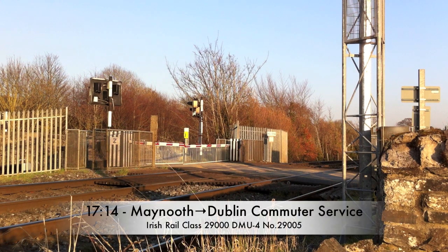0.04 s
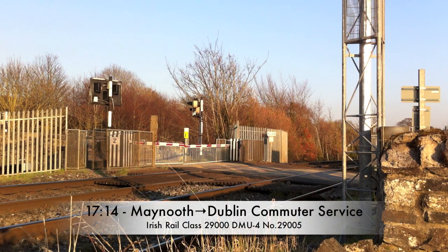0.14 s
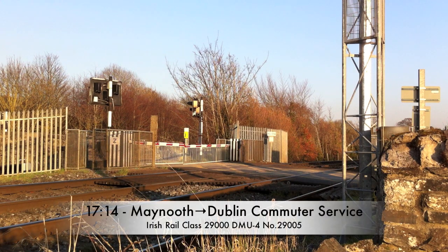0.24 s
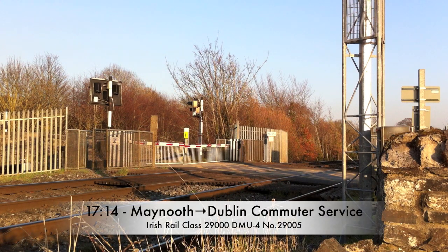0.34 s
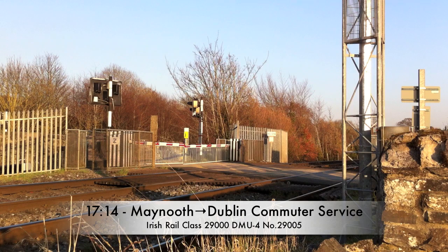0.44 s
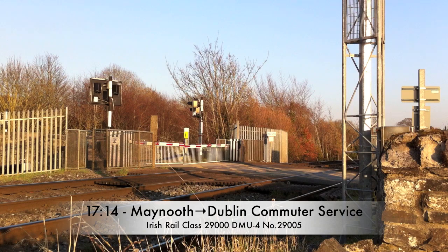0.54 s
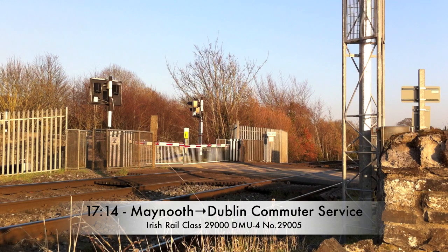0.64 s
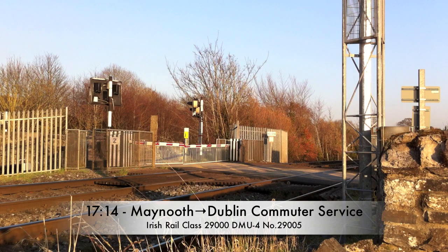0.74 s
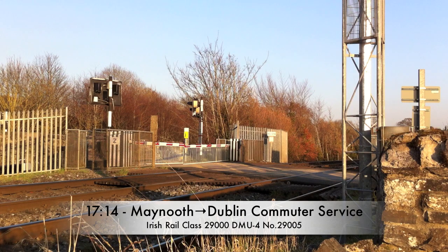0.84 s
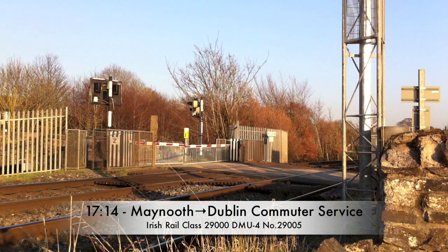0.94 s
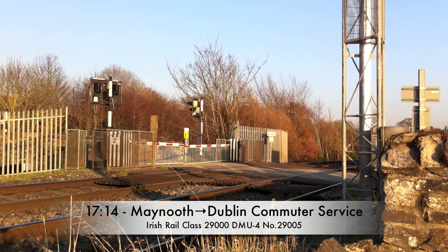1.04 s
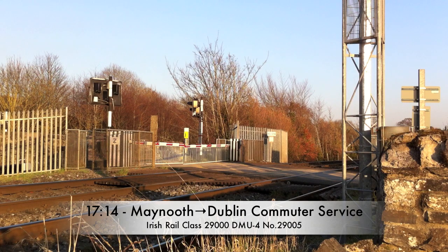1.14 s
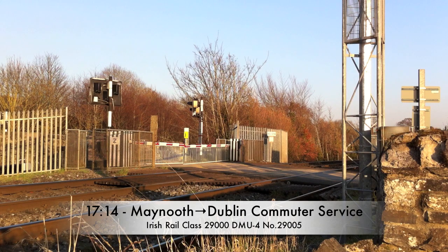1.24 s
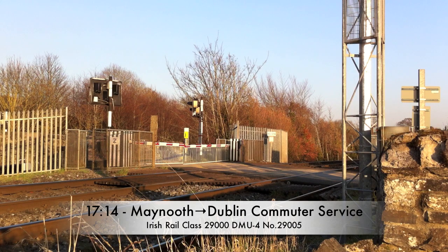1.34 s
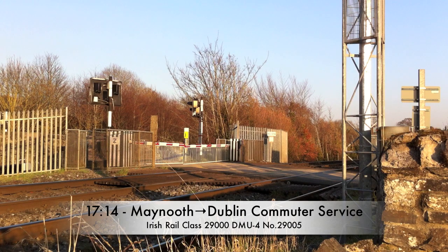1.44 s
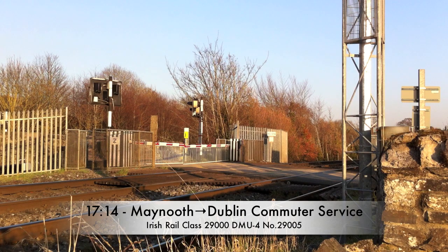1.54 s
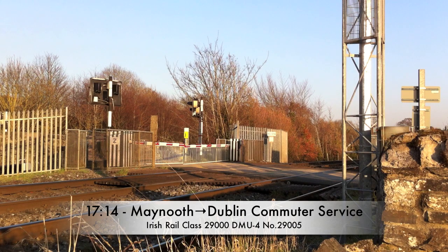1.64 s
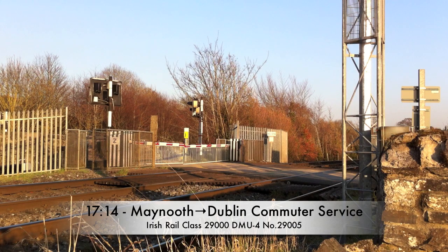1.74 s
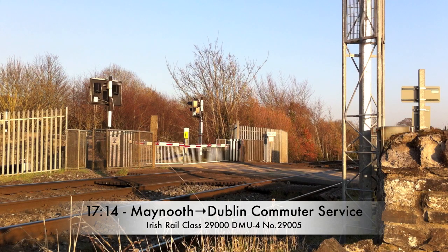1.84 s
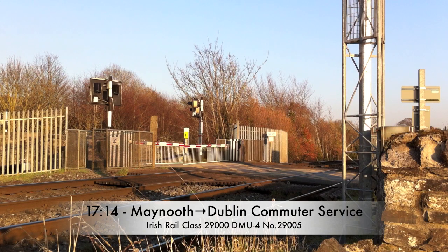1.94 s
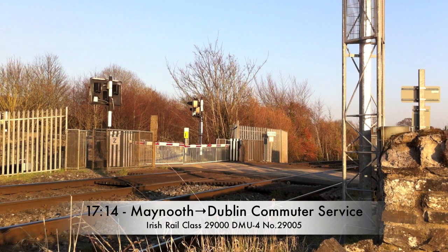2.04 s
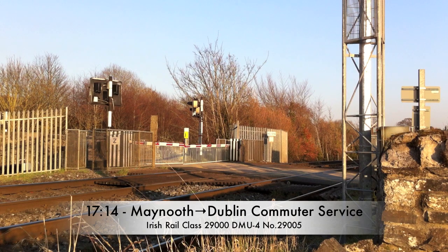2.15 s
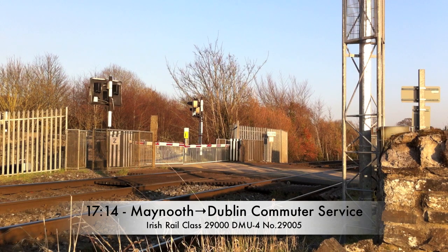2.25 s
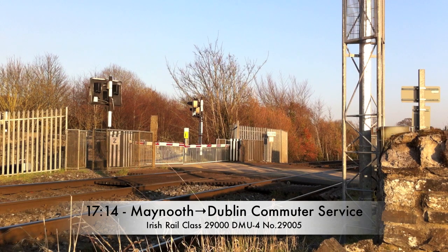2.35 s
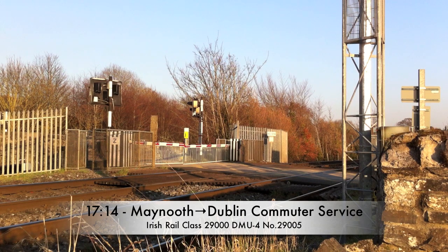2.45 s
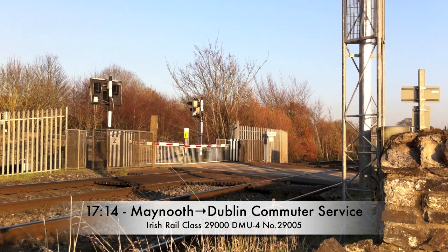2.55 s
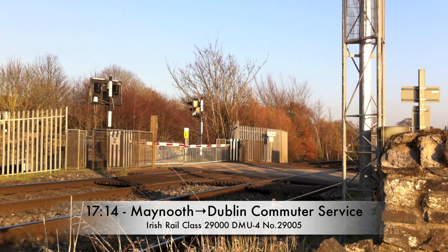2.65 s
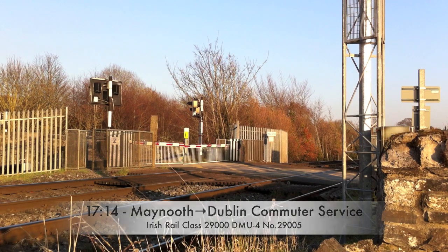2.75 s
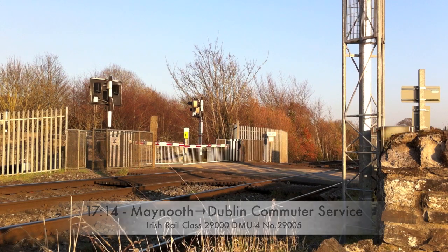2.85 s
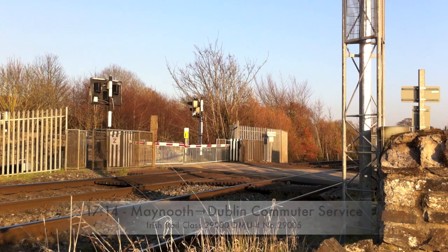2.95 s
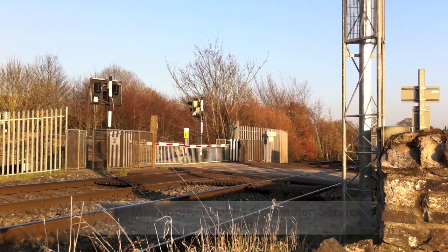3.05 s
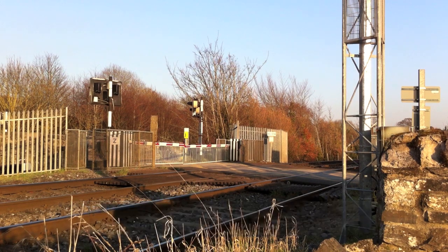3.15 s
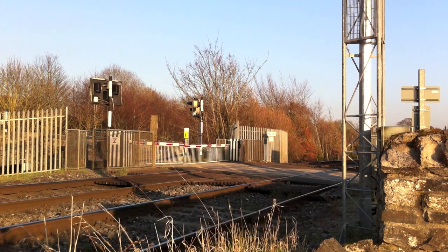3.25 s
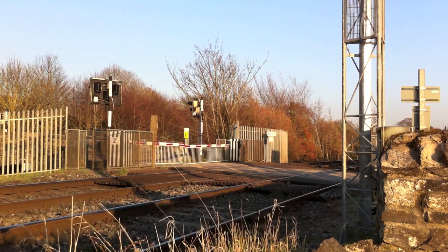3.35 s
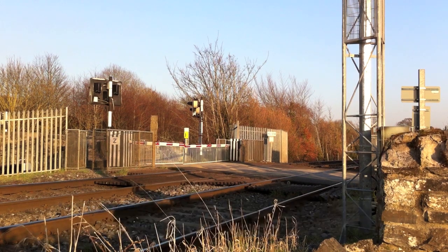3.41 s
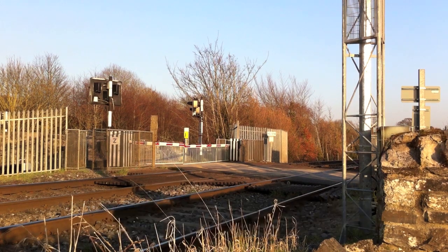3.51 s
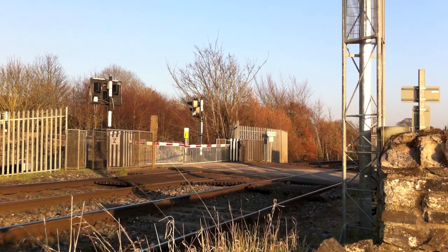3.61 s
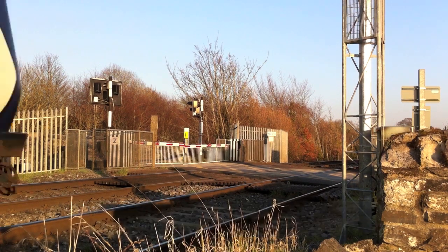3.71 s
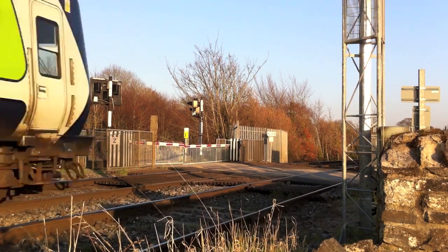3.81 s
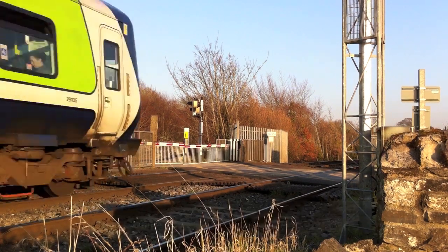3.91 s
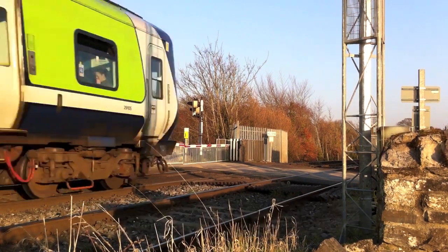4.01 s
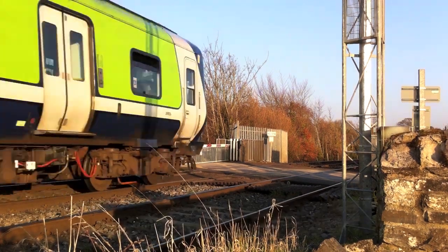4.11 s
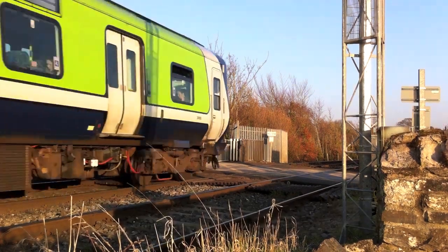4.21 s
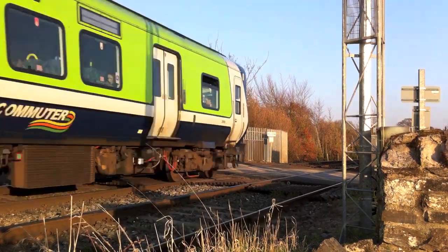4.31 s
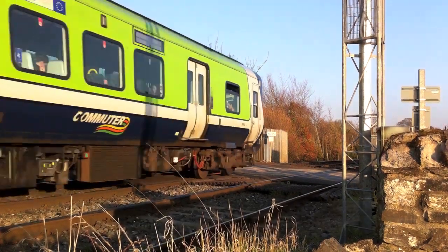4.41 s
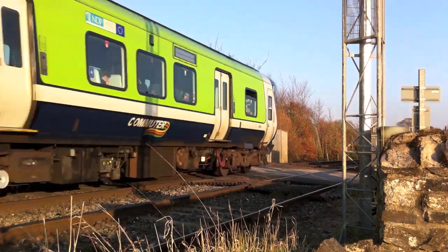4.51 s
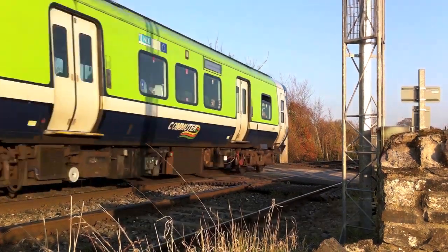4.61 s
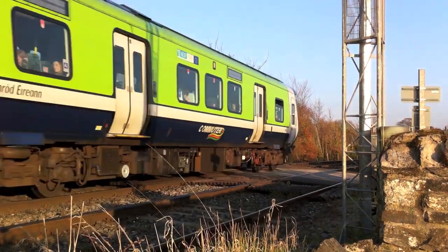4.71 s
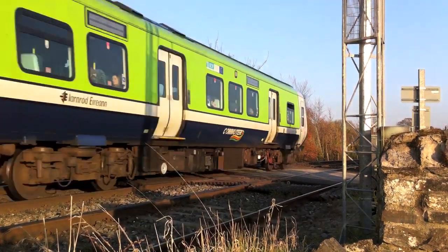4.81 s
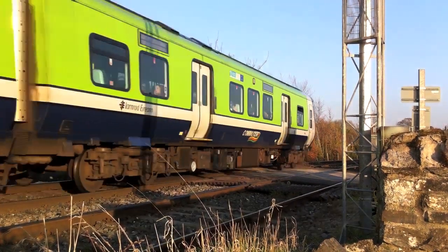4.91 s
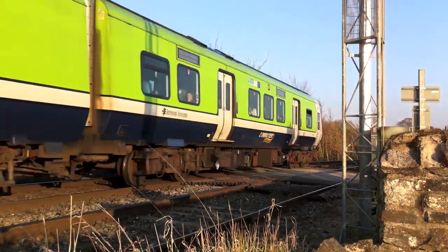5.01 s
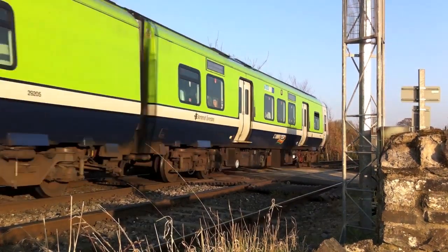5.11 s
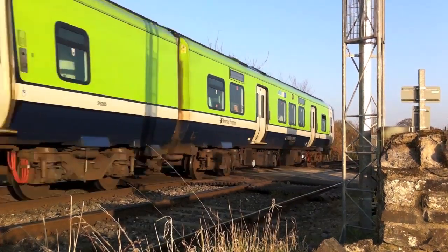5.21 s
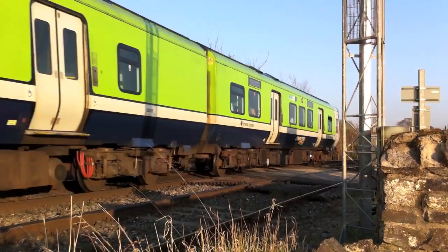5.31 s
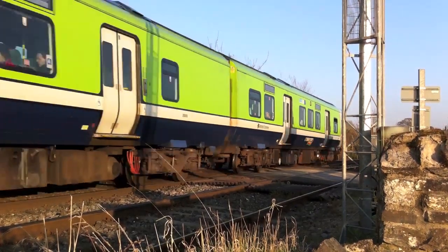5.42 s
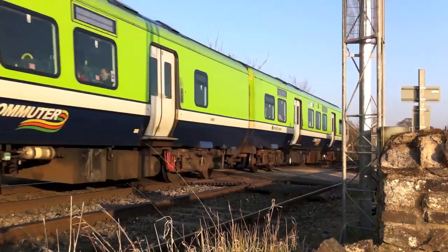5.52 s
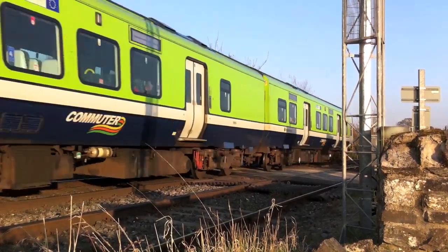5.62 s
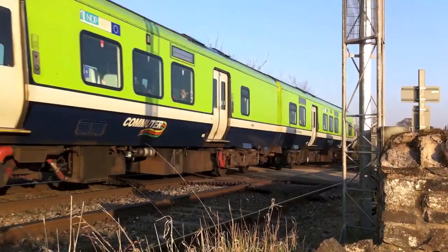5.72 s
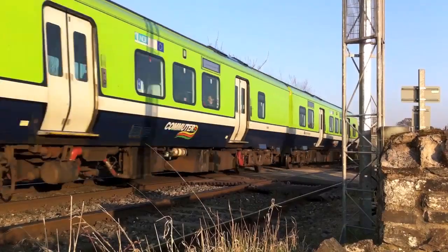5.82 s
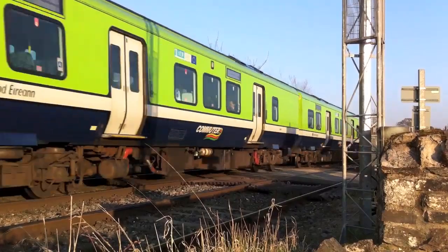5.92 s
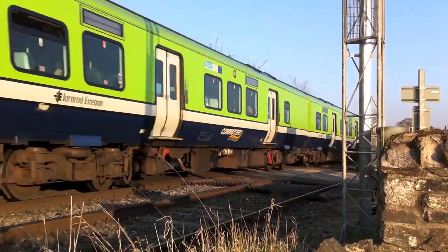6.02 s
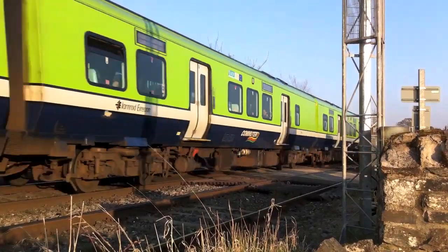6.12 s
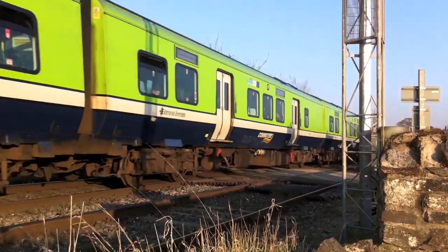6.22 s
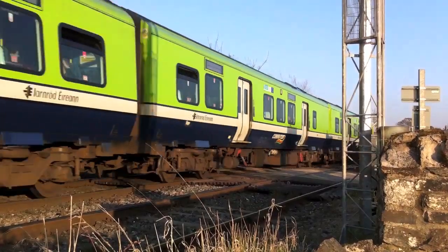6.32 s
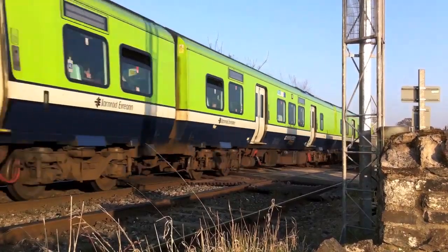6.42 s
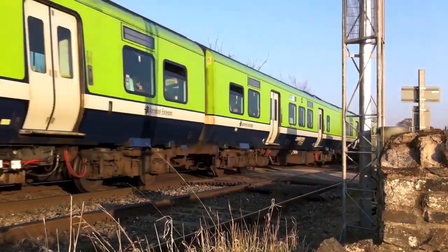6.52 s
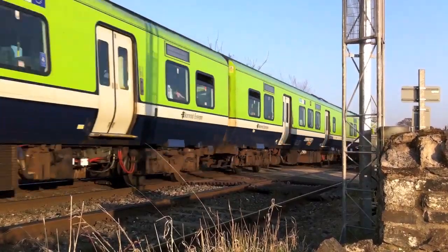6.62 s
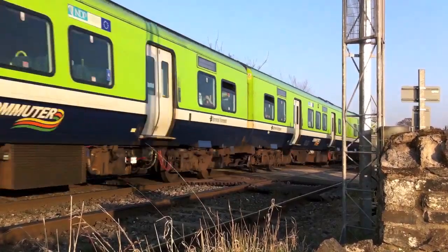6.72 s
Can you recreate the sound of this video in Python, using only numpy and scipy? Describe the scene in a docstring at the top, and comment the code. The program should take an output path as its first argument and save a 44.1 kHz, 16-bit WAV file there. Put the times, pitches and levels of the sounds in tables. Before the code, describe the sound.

A distant, narrow metallic rushing along the rails grows slowly for two seconds, then surges quickly as a diesel train reaches the single microphone near the track. The sound broadens into a dense, gritty roar with low thuds, ringing wheels and airy hiss. Each bogie makes a swell, and short gear and wheel tones glide downward. There is little deep bass, open air around it, and no fade-out.

```python
"""Diesel railcar train rolling past

A diesel railcar train approaches on welded rails and rolls past one microphone beside the track.
Shaped noise makes ballast, rails, sleepers, floor pans, ringing wheels, hissing fans and stirred air.
Sines make the engine drone and the brief notes of gears, wheels and floor pans; decaying sines make
short knocks and blips. A faint hiss from the rails and a low rumble of the surroundings lie beneath.
"""
import sys
import numpy as np
from scipy import signal
from scipy.fft import rfft, irfft, next_fast_len
from scipy.io import wavfile
from scipy.ndimage import uniform_filter1d, map_coordinates

SR = 44100
rng = np.random.default_rng(int(sys.argv[2]) if len(sys.argv) > 2 else 0)


def inscribe(sig):
    """Save sig as 16-bit PCM at rate SR to the path in sys.argv[1].

    A 1-D sig is mono; a 2-D sig holds one channel per row.
    Samples are clipped to [-1, 1] before scaling.
    """
    pcm = np.round(np.clip(np.atleast_2d(sig).T, -1, 1) * 32767)
    wavfile.write(sys.argv[1], SR, pcm.astype(np.int16))


def decibels_to_gain(level_db):
    """Convert a level in decibels to a linear amplitude gain (20 dB per decade)."""
    exponent = np.asarray(level_db, float) / 20
    return 10 ** exponent


N = 298116

# The train draws near, 0 dB = alongside. Each row: time in seconds, track-bed rumble in dB,
# rail roar in dB, wheel ring in dB, fan and air hiss in dB.
APPROACH_ROWS = [(0.0, -30.5, -30.5, -39, -33.5), (0.6, -31, -28.5, -31, -31), (1.2, -28, -26.5, -29, -28),
                 (1.8, -25.5, -22.5, -25, -24), (2.2, -20.5, -21.5, -21, -20.5),
                 (2.6, -18, -18, -15.5, -16.5), (2.85, -13, -15.5, -12.5, -14.5),
                 (3.05, -8.5, -20, -9, -11), (3.3, -5.5, -15, -7.5, -8.5), (3.45, -4, -4.5, -4.5, -5.5),
                 (3.6, -0.5, 0, -0.5, -0.5)]
# Bogies roll by. Each row: time in seconds, rail swell in dB, wheel swell in dB, ballast swell in dB.
BOGIE_ROWS = [(3.8, 5, 6, -2), (4.22, 5.5, 4.5, 1), (4.85, 2, 2.5, 0.5), (5.2, 3, 4.5, -0.3),
              (5.45, 5, 0.5, 1), (5.7, 0.5, 3.5, 1), (6.1, 5.5, 8, 2.5), (6.5, 6, 6, 1),
              (6.76, 3.5, 4, 1.5)]
BOGIE_S = 0.17  # s, half-width of a bogie's swell


def unit(x):
    """Scaled to rms 1."""
    return x / np.sqrt(np.mean(x ** 2) + 1e-20)


def curves(rows):
    """One value per sample for each column after the time."""
    s, *columns = np.transpose(rows)
    return [np.interp(np.arange(N) / SR, s, column) for column in columns]


def wobble(rate):
    """A smooth random curve, rate knots a second."""
    knots = rng.standard_normal(int(N * rate / SR) + 4)
    return map_coordinates(knots, [np.arange(N) * rate / SR])


def filtered(x, response):
    """x passed through a complex response of frequency."""
    size = next_fast_len(N + 8192)
    spectrum = rfft(x, size) * response(np.fft.rfftfreq(size, 1 / SR))
    return irfft(spectrum, size)[:N]


def slope(points):
    """Response through (Hz, dB) points on a log frequency axis."""
    hz, db = np.transpose(points)
    return lambda f: decibels_to_gain(np.interp(np.log(f + 1), np.log(hz), db))


def modes(table, steep=1):
    """Causal response of (Hz, width, dB) resonances; steep > 1 darkens the valleys."""
    def response(f):
        total = 0
        for k, (centre, width, db) in enumerate(table):
            peak = 1j * f * width / (centre * centre - f * f + 1j * f * width)
            total = total + (-1) ** k * decibels_to_gain(db) * peak ** steep  # neighbours have opposite signs
        return total
    return response


def rough(response, patchy_db, flutter_db, flutter_rate):
    """Noise of rms 1 through a response, with patches of random gain and a fluttering level."""
    z = signal.stft(rng.standard_normal(N), nperseg=1024)[2]
    field = uniform_filter1d(rng.standard_normal(z.shape), size=4, axis=0)  # across frequency
    field = uniform_filter1d(field, size=6, axis=1)  # across time
    noise = signal.istft(z * decibels_to_gain(patchy_db * unit(field)), nperseg=1024)[1][:N]
    fluttering = noise * decibels_to_gain(flutter_db * wobble(flutter_rate))
    return unit(filtered(fluttering, response))


def passing(far, near, **texture):
    """Noise that moves from the far resonances to the near ones as the train arrives."""
    # Each row: time in seconds, nearness (0 = heard along the rails, 1 = alongside).
    nearness = [(0, 0), (3.3, 0), (3.75, 1), (6.76, 1)]
    turn = np.pi / 2 * curves(nearness)[0]
    distant = np.cos(turn) * rough(modes(far, steep=2), **texture)
    return distant + np.sin(turn) * rough(modes(near, steep=2), **texture)


def swell(s, half_width, db):
    """Sum in dB of bell-shaped swells."""
    t = np.arange(N)[:, None] / SR
    return (db * np.exp(-((t - s) / half_width) ** 2)).sum(axis=1)


def gain(alongside_db, share, approach_db, swell_db):
    """Gain of a layer: its level alongside, its share of the approach, its swells."""
    return decibels_to_gain(alongside_db + share * approach_db + swell_db)


def ballast():
    """Wheel roughness shakes the ballast: a broad roar that swells or dips with the bogies."""
    # Spectrum of the ballast roar. Each row: frequency in Hz, density in dB per Hz.
    ballast_spectrum = [(40, -50), (70, -16), (110, -1), (300, 0), (500, -2), (720, -4), (1100, -6),
                        (1700, -9), (3000, -15.5), (5000, -39)]
    bed_db = curves(APPROACH_ROWS)[0]
    s, _, _, swell_db = np.transpose(BOGIE_ROWS)
    roar = rough(slope(ballast_spectrum), patchy_db=0.5, flutter_db=1.0, flutter_rate=60)
    return gain(-22, 0.97, bed_db, swell(s, BOGIE_S, swell_db)) * roar


def rails():
    """Wheel roughness shakes the rail, whose resonances are sharp from afar and broad alongside."""
    # Rail resonances afar, then alongside. Each row: frequency in Hz, width before steepening in Hz,
    # strength in dB.
    rail_far = [(520, 114, -3.5), (740, 160, -13), (902, 170, -3.5), (1068, 180, -1.5), (1207, 135, 1.5),
                (1367, 150, -2.5), (1520, 160, -8)]
    rail_near = [(810, 186, 2.5), (1010, 210, 3.5), (1172, 202, 5.5), (1430, 350, -1)]
    rail_db = curves(APPROACH_ROWS)[1]
    s, swell_db, _, _ = np.transpose(BOGIE_ROWS)
    roar = passing(rail_far, rail_near, patchy_db=1.2, flutter_db=2, flutter_rate=55)
    return gain(-25, 0.95, rail_db, swell(s, BOGIE_S, swell_db)) * roar


def sleepers():
    """Wheel roughness shakes the sleepers, which rumble in low resonances."""
    # Each row: frequency in Hz, width before steepening in Hz, strength in dB.
    sleeper_modes = [(153.8, 64, -2.5), (190, 36.5, 1), (223.2, 28, -0.5)]
    # The rumble swells briefly. Each row: time in seconds, half-width in seconds, swell in dB.
    rumble_swells = [(2.2, 0.15, 3.5), (3.02, 0.07, 4.5), (3.57, 0.1, 4.5), (4.12, 0.06, 4.5),
                     (4.34, 0.064, 8.5), (4.6, 0.11, 3.5), (4.95, 0.24, 7), (5.3, 0.08, 2.5),
                     (5.58, 0.09, 4.5), (6.05, 0.16, 8.5), (6.65, 0.07, 7.5)]
    bed_db = curves(APPROACH_ROWS)[0]
    rumble = rough(modes(sleeper_modes, steep=2.36), patchy_db=0.5, flutter_db=0.5, flutter_rate=21)
    return gain(-28.5, 0.84, bed_db, swell(*np.transpose(rumble_swells))) * rumble


def floor_pans():
    """Wheel roughness shakes the car floors, which boom in low resonances."""
    # Each row: frequency in Hz, width before steepening in Hz, strength in dB.
    pan_modes = [(264.9, 52.4, 8), (315.5, 13, -11)]
    # The boom swells or dips. Each row: time in seconds, half-width in seconds, change in dB.
    boom_swells = [(3.0, 0.14, -18), (3.57, 0.067, 9.5), (4.5, 0.12, 11), (4.95, 0.13, 7.5),
                   (5.36, 0.087, 6), (5.8, 0.09, 6), (6.0, 0.07, 10.5), (6.21, 0.062, 8.5),
                   (6.76, 0.049, 11)]
    bed_db = curves(APPROACH_ROWS)[0]
    boom = rough(modes(pan_modes, steep=2.66), patchy_db=1.5, flutter_db=0.0, flutter_rate=25)
    return gain(-29, 1.02, bed_db, swell(*np.transpose(boom_swells))) * boom


def wheels():
    """Wheel discs ring in narrow bands, sharp from afar and broad alongside."""
    # Main and upper wheel resonances, each afar, then alongside. Each row: frequency in Hz,
    # width before steepening in Hz, strength in dB.
    wheel_far = [(1950, 180, -18), (2150, 270, 0.5), (2785, 280, -8.5)]
    wheel_near = [(1647, 360, 2), (2124, 440, 8), (2760, 510, -2.5)]
    upper_far = [(3660, 190, 0), (4500, 600, -12)]
    upper_near = [(3150, 420, 5.1), (3660, 550, 16)]
    # The upper ring flares ahead of the first bogie. Each row: time in seconds, half-width in seconds,
    # swell in dB.
    squeal = [(3.27, 0.22, 6)]
    wheel_db = curves(APPROACH_ROWS)[2]
    s, _, swell_db, _ = np.transpose(BOGIE_ROWS)
    ring = passing(wheel_far, wheel_near, patchy_db=2.5, flutter_db=0.45, flutter_rate=30)
    ring *= gain(-31.5, 0.94, wheel_db, swell(s, BOGIE_S, swell_db))
    upper = passing(upper_far, upper_near, patchy_db=1.5, flutter_db=1.0, flutter_rate=14)
    upper *= gain(-38.5, 0.99, wheel_db, swell(*np.transpose(squeal)))
    return ring + upper


def fans_and_air():
    """Radiator fans and stirred air hiss as shaped noise that swells as each fan goes by."""
    # Spectra of fan and air hiss. Each row: frequency in Hz, density in dB per Hz.
    fan_spectrum = [(2000, -4.5), (3500, -2), (4400, 0), (5000, -0.5), (5600, -2), (6000, -5),
                    (8000, -11.5), (10000, -20)]
    air_spectrum = [(4000, -35), (6500, -2), (8000, -1), (10000, -3), (13000, -8.5), (15700, -25)]
    # Each row: time in seconds, half-width in seconds, fan swell in dB, air swell in dB.
    fan_passes = [(3.85, 0.2, 1.5, 1), (4.2, 0.1, 0.3, 1), (5.0, 0.18, 2.5, 2), (5.36, 0.25, 5.5, 6),
                  (5.8, 0.25, 3, 1), (6.2, 0.18, 2, 3), (6.5, 0.17, 1.5, 1.5)]
    near_db = curves(APPROACH_ROWS)[3]
    s, half_width, fan_swell, air_swell = np.transpose(fan_passes)
    grit = decibels_to_gain(0.4 * wobble(9))  # shared by both hisses
    fan = rough(slope(fan_spectrum), patchy_db=1.95, flutter_db=0.15, flutter_rate=17)
    fan *= gain(-29.5, 0.97, near_db, swell(s, half_width, fan_swell))
    air = rough(slope(air_spectrum), patchy_db=2.6, flutter_db=0.4, flutter_rate=25)
    air *= gain(-38.5, 0.79, near_db, swell(s, half_width, air_swell))
    return grit * (fan + air)


def engines():
    """Each exhaust drones on a few multiples of its firing rate, slightly unsteady."""
    # One table per under-floor engine; the first speeds up as it arrives. Each row: time in seconds,
    # firing rate in Hz, level in dB.
    engine_tables = [
        [(0, 78, -62), (0.8, 77.7, -61), (1.6, 77.8, -58.5), (2.3, 79.4, -60), (2.9, 76.6, -56), (3.5, 82, -52),
         (3.85, 90, -39), (4.2, 95.5, -40), (4.5, 96, -50)],
        [(0, 101.8, -65), (1.2, 101.9, -60), (2.1, 100, -60), (2.9, 102, -69), (3.3, 103.3, -45),
         (3.6, 103.5, -38), (3.85, 101, -50)],
        [(4.4, 112, -48.5), (4.75, 103.3, -37), (5.2, 104, -48)],
        [(5.2, 105, -48), (5.6, 105.4, -43), (5.85, 105.8, -32.5), (6.3, 101.8, -33.5), (6.76, 96, -42)],
    ]
    # Each row: multiple of the firing rate, strength in dB.
    exhaust = [(2 / 3, -4.5), (1, 0), (2, -3)]
    out, t = np.zeros(N), np.arange(N) / SR
    for rows in engine_tables:
        hz, db = curves(rows)
        phase = 2 * np.pi * np.cumsum(hz) / SR + 0.15 * wobble(12)
        first, last, fade_s = rows[0][0], rows[-1][0], 0.15
        fade = np.interp(t, [first - fade_s, first, last, last + fade_s], [0, 1, 1, 0])
        drone = np.zeros(N)
        for multiple, strength_db in exhaust:
            drone += decibels_to_gain(strength_db + 0.55 * wobble(9.2)) * np.sin(multiple * phase)
        out += np.sqrt(2) * decibels_to_gain(db) * fade * drone
    return out


def singing_notes():
    """Short gliding tones that swell and fade, with a wavering phase and a throbbing level."""
    # Gear, wheel and floor-pan notes, most sinking as they pass. Each row: start in seconds,
    # end in seconds, start pitch in Hz, end pitch in Hz, level in dB.
    note_rows = [(1.5, 2.55, 190, 187.4, -53.5), (2.5, 3.5, 235.7, 228.3, -41),
                 (4.149, 5.2, 271.3, 261.4, -27), (5.648, 6.405, 272.3, 257, -30),
                 (1.9, 2.02, 2170, 2160, -56), (2.902, 3.082, 3590, 3600, -47),
                 (3.179, 3.302, 3630, 3630, -43.5), (3.3, 3.52, 3750, 3740, -48),
                 (3.12, 3.408, 1210, 1230, -37), (3.62, 3.865, 1397, 1440, -30),
                 (3.68, 3.868, 838, 832, -27.5), (4.36, 4.5, 986, 985, -27.5),
                 (4.95, 5.143, 1172, 1168, -30), (5.24, 5.403, 1430, 1430, -29),
                 (5.25, 5.783, 1163, 1100, -23.5), (5.4, 5.62, 1205, 1158, -30),
                 (5.9, 6.363, 845, 822, -24.5), (6.0, 6.317, 915, 890, -24.5),
                 (6.683, 6.778, 988, 1031, -19.5)]
    out = np.zeros(N)
    waver = 0.5 * wobble(30)  # radians
    throb = decibels_to_gain(2.4 * wobble(25))
    for start, end, hz0, hz1, db in note_rows:
        i = np.arange(round(start * SR), min(round(end * SR), N))
        u = (i / SR - start) / (end - start)  # 0 to 1 through the note
        phase = 2 * np.pi * np.cumsum(hz0 + (hz1 - hz0) * u) / SR + waver[i]
        envelope = np.abs(np.sin(np.pi * u)) ** 0.63
        out[i] += np.sqrt(2) * decibels_to_gain(db) * throb[i] * envelope * np.sin(phase)
    return out


def knocks_and_blips():
    """A softly starting note and a weaker overtone die away; higher notes last more cycles."""
    # Short knocks and blips, low and high, as the train nears and passes. Each row: start in seconds,
    # level in dB before a 3 dB lift, pitch in Hz.
    knock_rows = [(0.058, -34, 159), (0.189, -35, 175), (0.386, -40, 1280), (0.87, -37, 147),
                  (1.807, -36, 187), (1.943, -40, 2140), (1.99, -37, 180), (2.22, -34, 202),
                  (2.918, -24, 1174), (3.029, -23.5, 484), (3.15, -23, 476), (3.187, -18, 520),
                  (3.187, -20, 2170), (3.226, -23, 2150), (3.34, -18, 460), (3.416, -20, 288),
                  (3.459, -17, 200), (3.479, -13.5, 190), (4.055, -12, 157), (4.285, -22, 245),
                  (4.43, -8, 261), (5.014, -13, 182), (5.168, -14, 185), (5.281, -10, 190),
                  (6.498, -9.5, 197), (6.70, -6, 990)]
    out, t = np.zeros(N + SR), np.arange(SR // 10) / SR
    attack = 1 - np.exp(-t / 0.0026)
    for s, db, hz in knock_rows:
        t60 = 0.086 * (180 / hz) ** 0.28  # s, to fall by 60 dB
        ring = np.sin(2 * np.pi * hz * t) + 0.23 * np.sin(2 * np.pi * 2.0 * hz * t)
        out[round(s * SR):][:len(t)] += decibels_to_gain(db + 3.0 - 60 * t / t60) * attack * ring
    return out[:N]


def rail_hiss():
    """High vibration runs along the rails far ahead of the train."""
    # Each row: frequency in Hz, width before steepening in Hz, strength in dB.
    hiss_modes = [(3110, 740, -5), (3800, 330, -6), (4970, 1800, -15), (6650, 1000, 0), (9330, 440, -1),
                  (11200, 600, -9), (12560, 1300, -4.5), (14500, 1500, -8)]
    # Each row: time in seconds, level in dB.
    hiss_level = [(0, -58.5), (1.5, -55), (3, -51), (6.76, -53)]
    hiss = rough(modes(hiss_modes, steep=2), patchy_db=1, flutter_db=0.2, flutter_rate=8)
    return decibels_to_gain(curves(hiss_level)[0]) * hiss


def ground():
    """A faint, steady low rumble of the surroundings."""
    # Each row: frequency in Hz, density in dB per Hz.
    ground_spectrum = [(20, -14), (40, -5), (60, -7), (90, -11), (125, -11), (170, -16), (300, -60)]
    rumble = rough(slope(ground_spectrum), patchy_db=1, flutter_db=0.5, flutter_rate=4)
    return decibels_to_gain(-60) * rumble


def scene():
    """Everything reaches one microphone."""
    track = ballast() + rails() + sleepers() + floor_pans()
    train = wheels() + fans_and_air() + engines() + singing_notes()
    return (track + train + knocks_and_blips() + rail_hiss() + ground())[None]


def band_limit(x):
    """A steep low-pass at the top of the band."""
    return signal.sosfilt(signal.butter(12, 15680, fs=SR, output="sos"), x)


def record(dry):
    """The small microphone loses the deepest bass, as two cascaded first-order low cuts."""
    corner_hz = 90
    low_cut = lambda f: (1j * f / (corner_hz + 1j * f)) ** 2
    mix = filtered(dry[0], low_cut)[None]
    return band_limit(mix)


dry = scene()
out = record(dry)
inscribe(out)
```